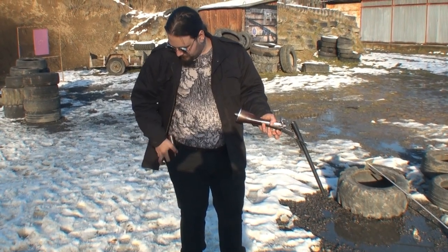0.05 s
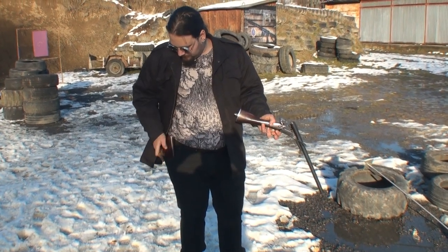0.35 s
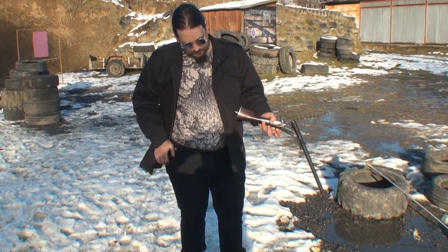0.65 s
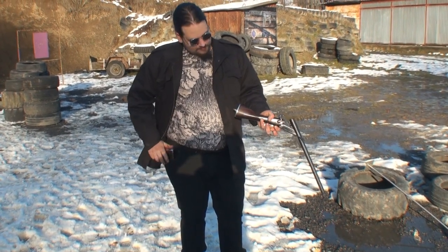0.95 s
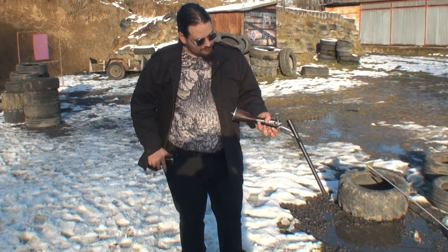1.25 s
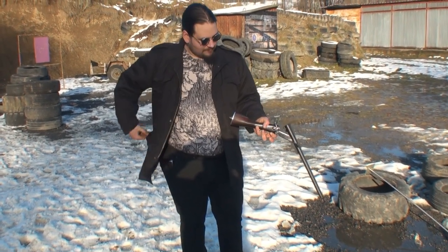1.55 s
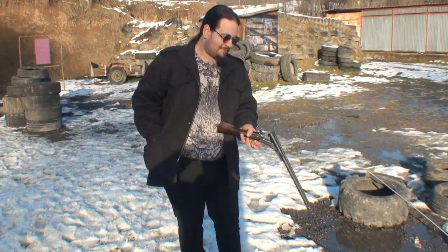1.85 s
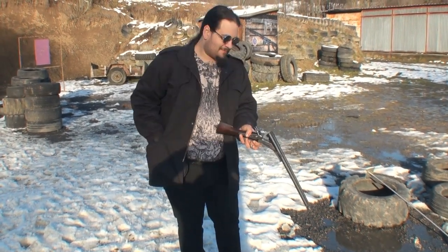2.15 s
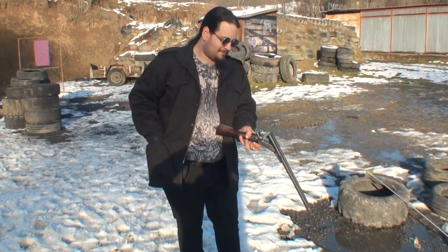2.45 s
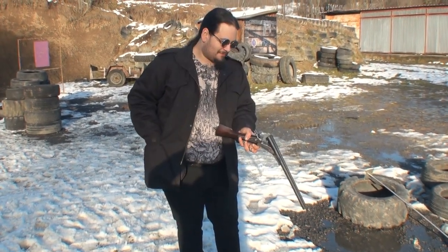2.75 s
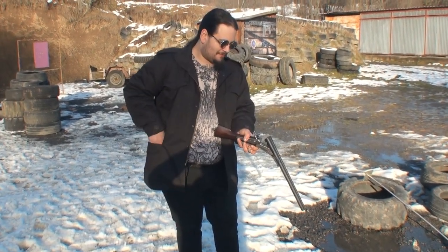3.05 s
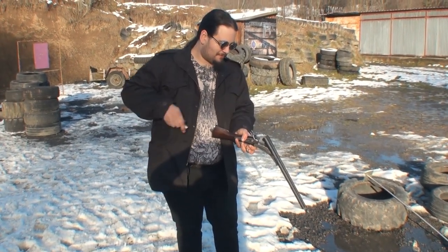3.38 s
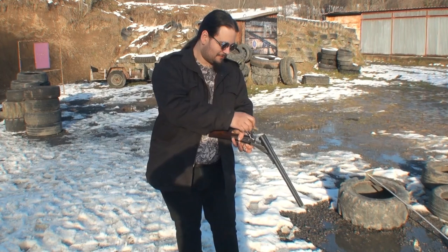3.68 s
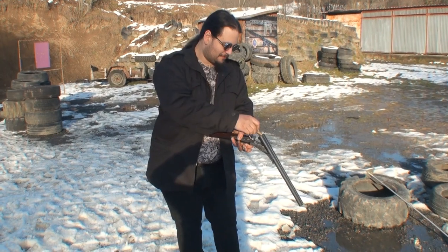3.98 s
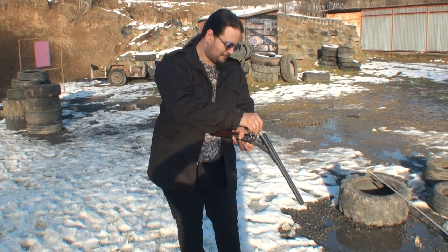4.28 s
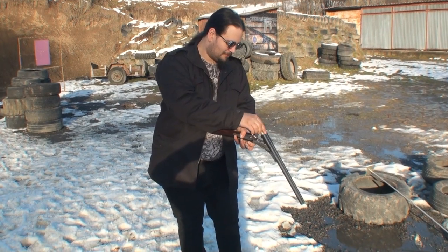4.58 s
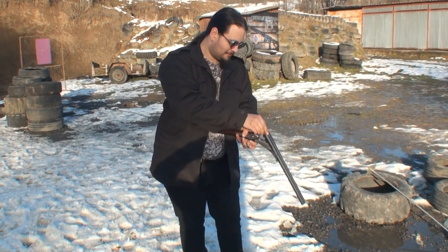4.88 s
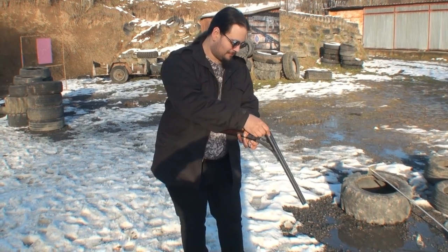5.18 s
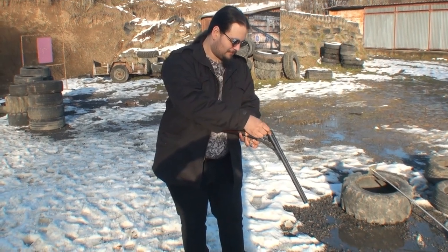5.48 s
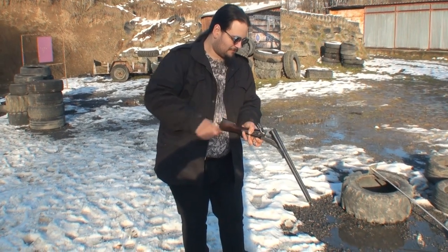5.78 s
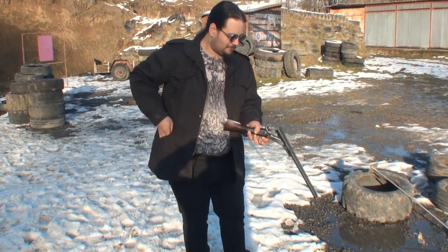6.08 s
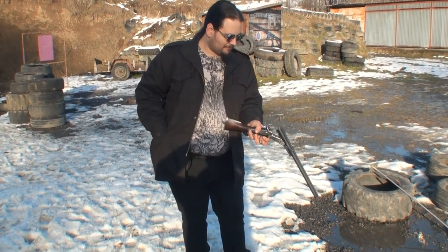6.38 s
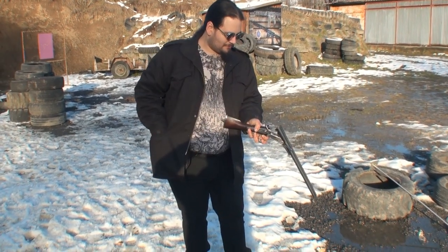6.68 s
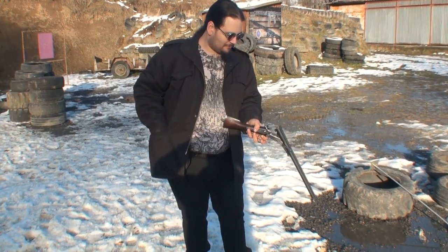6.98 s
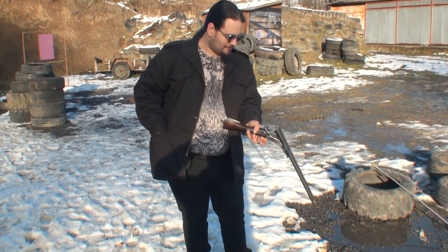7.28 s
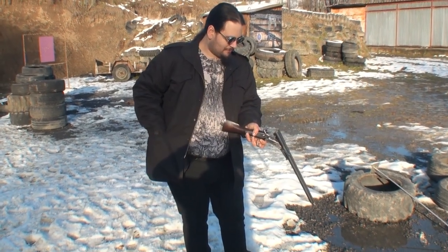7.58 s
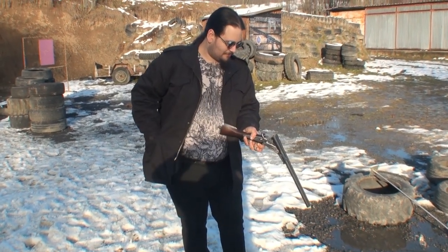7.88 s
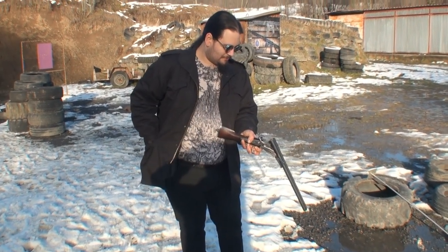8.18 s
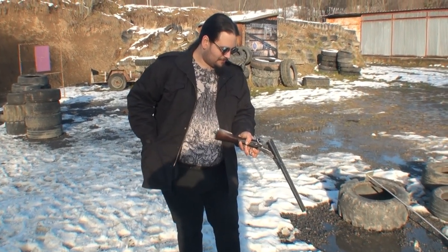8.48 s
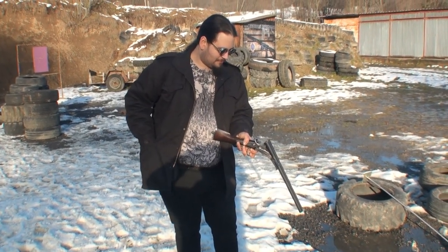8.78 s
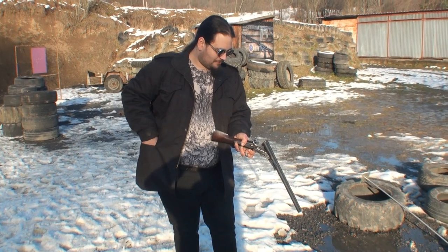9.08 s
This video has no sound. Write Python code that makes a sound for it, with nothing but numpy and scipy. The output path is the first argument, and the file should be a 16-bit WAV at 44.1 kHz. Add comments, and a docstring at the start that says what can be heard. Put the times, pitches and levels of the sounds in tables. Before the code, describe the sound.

A stud snaps shut with one loud, hard click, then a belt catch clacks and gives a tiny squeak. Small metal pieces clink in a jacket pocket. Cartridges tap into a shotgun's steel chambers and seat with a brief ring, followed by a soft plop, more clinks and plastic ticks. Cloth rustles throughout over faint outdoor hiss and a low hollow drone. The handling is straight ahead, with a weak echo.

```python
"""A man loads a broken-open double-barrel shotgun in a snowy yard. A stud snaps, then a belt catch
clacks and squeaks. The level dips briefly; metal pieces clink as he digs in his jacket. From 4 s,
cartridges tap the steel chambers and seat, ringing the barrels. A soft plop follows, then more clinks
and plastic ticks. Throughout, the jacket rustles over faint hiss, hum and a swelling hollow drone;
ground and wall return a weak echo."""
import sys
import numpy as np
from scipy import signal
from scipy.fft import rfft, irfft, next_fast_len
from scipy.io import wavfile
from scipy.ndimage import uniform_filter1d

SR = 44100
rng = np.random.default_rng(int(sys.argv[2]) if len(sys.argv) > 2 else 0)


def transcribe(u):
    """Save the signal u as a 16-bit wav file named by the first command-line argument.

    u: samples, shape (n,) or (channels, n), limited to [-1, 1]; the rate is SR.
    q: integer samples, one column per channel.
    """
    v = np.clip(np.atleast_2d(u).T, -1, 1)
    q = np.round(v * 32767).astype(np.int16)
    wavfile.write(sys.argv[1], SR, q)


N = 412148

# cartridge contacts: start_s, scrape_s, level_db, depth (0 rim, 1 home)
CARTRIDGE_CONTACTS = [(4.003, .005, -45.5, .55), (4.160, 0.0099, -43, .15), (4.250, 0.0096, -37, .5),
                      (4.395, 0.03, -47.5, .05), (5.193, 0.0013, -38.5, 1), (5.2651, .001, -41.5, 1),
                      (5.2712, 0.0035, -41.5, 1)]
# barrel modes: pitch_hz, level_db, t60_s
BARREL_MODES = [(670, -3, 0.078), (1085, 3, 0.094), (1410, -11, 0.059), (1780, -5, 0.021), (2010, 2, 0.068),
                (2460, -7, 0.065), (2800, -13, 0.062), (3180, 3, .02), (3760, 2, 0.023), (4270, -19, 0.013),
                (5680, 9, .03), (7260, 6, .03), (8100, 5, .035), (11800, -1, .03), (12700, -6, .02)]
# barrel bands: edge_hz
BARREL_EDGES_HZ = [500, 1500, 2800, 4500, 6500, 14000]
# rim graze, wall tap, seating: gain_db per band
BARREL_VOICES_DB = [(-1, -10, -16, -19, 1.5), (0, -21, -18, -28, -13.5), (-0.094, -2.5, -5, -6.5, -15)]


def chambers():
    """Cartridges graze the breech and drop home, ringing the barrels."""
    track = np.zeros(N)
    for start_s, scrape_s, level_db, depth in CARTRIDGE_CONTACTS:
        bands_db = level_db + blend_voices(BARREL_VOICES_DB, depth)
        tap = strike(scrape_s, bands_db, BARREL_MODES, BARREL_EDGES_HZ, crack_db=10.5, crack_t60_s=0.014)
        add(track, start_s, tap)
    return amp(-1.1) * track


# stud impacts: start_s, level_db
STUD_IMPACTS = [(0.4337, -27), (0.436, 1.5), (.4376, -24), (.4390, -28), (0.44, -23), (.4424, -35),
                (.4475, -33)]
# stud click spectrum: freq_hz, level_db
STUD_SPECTRUM = [(300, -48), (800, -7.5), (1500, -10), (2300, -0.5), (3000, 3.5), (4000, -1), (5500, -6.5),
                 (8300, -20.5), (11500, -14.5), (13000, -21), (15000, -44)]


def stud():
    """A stud snaps shut: a hard click, small bounces, a trace of buzz."""
    track, click = np.zeros(N), pulse(STUD_SPECTRUM)
    t = np.arange(SR // 20) / SR
    buzz = amp(-29) * rng.standard_normal(len(t)) * fade(t, t60_s=0.044)
    for start_s, level_db in STUD_IMPACTS:
        add(track, start_s, -amp(level_db) * click)
    return amp(-1.5) * (track + signal.fftconvolve(track, buzz)[:N])


# catch contacts: start_s, scrape_s, level_db
CATCH_CONTACTS = [(1.0427, 0.0011, -23.5), (1.0491, 0.0023, -32.5), (1.066, 0.0036, -40),
                  (1.077, .007, -38), (1.122, 0.0092, -36), (1.1293, .003, -34)]
# catch modes: pitch_hz, level_db, t60_s
CATCH_MODES = [(756, 2, 0.052), (1050, 6.5, 0.024), (1840, -9, 0.014), (2060, 8, 0.023),
               (2250, -0.5, 0.024), (3240, 5, 0.024), (3570, 9, 0.01), (4740, 4.5, .018), (5620, 11, 0.014),
               (7330, 7, 0.015), (11300, -13, .012)]
# catch bands: edge_hz
CATCH_EDGES_HZ = [500, 1400, 2700, 4300, 14000]
# catch timbre: gain_db per band
CATCH_VOICE_DB = [-6.5, -.5, -5, -9]
# squeak glide: time_s, pitch_hz, level_db
CATCH_SQUEAK = [(1.1205, 2400, -40), (1.1250, 2120, -23), (1.1280, 2000, -22), (1.131, 1700, -24.5),
                (1.1360, 1650, -45)]


def belt_catch():
    """The stiff catch clacks, then squeaks home; pitch falls as stick-slip slows."""
    track = np.zeros(N)
    for start_s, scrape_s, level_db in CATCH_CONTACTS:
        bands_db = level_db + np.array(CATCH_VOICE_DB)
        clack = strike(scrape_s, bands_db, CATCH_MODES, CATCH_EDGES_HZ, crack_db=4, crack_t60_s=0.015)
        add(track, start_s, clack)
    time_s, pitch_hz, squeak_db = np.transpose(CATCH_SQUEAK)
    t = np.arange(time_s[0], time_s[-1], 1 / SR)
    phase = 2 * np.pi * np.cumsum(np.interp(t, time_s, pitch_hz)) / SR
    squeak = np.sin(phase) + amp(-28) * np.sin(2 * phase)
    add(track, time_s[0], amp(np.interp(t, time_s, squeak_db)) * squeak)
    return amp(-1) * track


# pocket contacts: start_s, scrape_s, knock_db, ring_db, place (0 middle, 1 end), t60_scale
POCKET_CONTACTS = [(1.957, 0.021, -43.5, -44, 0, 1.6), (2.2674, 0.0032, -37.5, -38, 0.24, 0.67),
                   (2.275, .01, -41, -39, 1, 0.63), (2.2875, 0.0074, -34, -31, 1, .45),
                   (2.302, 0.012, -52, -31, 0.63, 0.32), (2.377, .018, -51, -43, .6, .6),
                   (3.012, 0.0026, -38.5, -33, 0.23, 0.51), (3.0528, 0.0025, -46.5, -38, 0, 0.73),
                   (3.108, 0.009, -48, -37, 0.19, 0.46), (6.269, 0.031, -48, -39, 0, 0.92),
                   (6.3175, .0022, -36.5, -51, .7, .7), (6.322, 0.0072, -50, -34, 0.96, 0.74),
                   (6.541, .0034, -46, -42.5, 0.69, 1.7), (6.565, .0036, -52, -39, 0.6, 1.6),
                   (6.584, .0037, -47, -36, 0.18, 1.8), (8.0581, 0.0044, -36.5, -32.5, 0, 0.96),
                   (8.072, .008, -41, -36.5, .4, 0.67), (8.121, .003, -55, -46, 1, 0.74),
                   (8.235, 0.0074, -46, -42.5, 0.58, 1), (8.276, 0.013, -41, -36, .25, .6),
                   (8.7645, 0.0042, -40.5, -35.5, 0.23, 4.3), (8.804, 0.025, -48, -35, 0.53, 0.98),
                   (9.138, 0.019, -59, -46.5, .7, 1)]
# knock spectrum: freq_hz, level_db
KNOCK_SPECTRUM = [(300, -17), (750, 2), (1000, -3), (1280, 5), (1550, -1), (2600, -5.5), (4000, -9.5),
                  (6000, -12.5), (8000, -16), (10000, -19), (13000, -19), (16000, -29)]
# metal piece modes: pitch_hz, level_db, base_t60_s
CLINK_MODES = [(1957, -3, 0.18), (5010, -14.5, 0.15), (5773, -2, 0.15), (5795, -19, 0.22), (5880, -8, 0.12),
               (7000, 0.5, 0.1), (7400, -15, 0.073), (9100, -17, .08), (11300, -19, .09),
               (11080, -2.5, 0.13), (12898, -17, .08), (13561, -14, .08)]
# clink bands: split_hz
CLINK_SPLITS_HZ = [4000, 6500, 9000]
# middle hit, end hit: gain_db per band
CLINK_VOICES_DB = [(0, 0, -19, -12.5), (-13, 0, -2.5, -19.5)]


def pocket_clinks():
    """Small metal pieces knock and ring in pure tones; cloth damping varies per contact."""
    track, t = np.zeros(N), np.arange(SR // 4) / SR
    pitch_hz, mode_db, base_t60_s = np.transpose(CLINK_MODES)
    band = np.digitize(pitch_hz, CLINK_SPLITS_HZ)
    click = pulse(KNOCK_SPECTRUM)
    for start_s, scrape_s, knock_db, ring_db, place, t60_scale in POCKET_CONTACTS:
        force = contact_force(scrape_s, t)
        burst = rng.standard_normal(SR // 20) * fade(t[:SR // 20], t60_s=0.017)
        knock = signal.fftconvolve(click, burst)
        add(track, start_s, amp(knock_db) * unit_hit(signal.fftconvolve(force, knock)))
        modes = np.sin(2 * np.pi * pitch_hz[:, None] * t) * fade(t, base_t60_s[:, None] * t60_scale)
        tones = signal.fftconvolve(force[None], modes, axes=1)
        place_db = blend_voices(CLINK_VOICES_DB, place)[band]
        gains = amp(ring_db + mode_db + place_db + rng.normal(0, 1, len(pitch_hz)))
        add(track, start_s, sum(gain * unit_hit(tone) for gain, tone in zip(gains, tones)))
    return track


# hull and jacket trim contacts: start_s, scrape_s, level_db, hardness (0 to 1)
HULL_CONTACTS = [(0.771, 0.0054, -41, 0.7), (0.988, .012, -40.5, .15), (1.76, 0.0025, -47, .5),
                 (1.8016, .001, -41.5, 0), (3.321, .002, -55, .7), (3.337, 0.036, -42, 1),
                 (3.355, .0069, -47, 0.7), (7.871, .026, -48, .75), (7.913, .012, -42.5, 0.17),
                 (8.102, .012, -43.5, .1), (8.376, 0.013, -40.5, .15), (8.386, .0073, -43, .5),
                 (8.533, 0.013, -47, .5), (8.572, 0.011, -39.5, .5), (8.581, 0.011, -40.5, 0.45)]
# hull modes: pitch_hz, level_db, t60_s
HULL_MODES = [(1200, 1, 0.016), (1390, 8.5, 0.0025), (2970, -8.5, 0.011), (3330, -15, 0.026),
              (5180, -8.5, 0.01), (7430, 1, 0.0045)]
# hull bands: edge_hz
HULL_EDGES_HZ = [500, 1800, 4500, 14000]
# soft, firm, hard contact: gain_db per band
HULL_VOICES_DB = [(-1.5, -9.5, -14), (-8.5, -1, -9.5), (-11, -7, 1.5)]
# hollow plop: start_s, level_db, pitch_hz, length_s
HULL_PLOP = [(6.0620, -28, 660, .0045)]


def hulls():
    """Plastic hulls tick with hardly any ring; one soft plop."""
    track = np.zeros(N)
    for start_s, scrape_s, level_db, hardness in HULL_CONTACTS:
        bands_db = level_db + blend_voices(HULL_VOICES_DB, hardness)
        tick = strike(scrape_s, bands_db, HULL_MODES, HULL_EDGES_HZ, crack_db=-5.5, crack_t60_s=0.0081)
        add(track, start_s, tick)
    for start_s, level_db, pitch_hz, length_s in HULL_PLOP:
        t = np.arange(round(length_s * SR)) / SR
        arch = np.sqrt(np.abs(np.sin(np.pi * t / length_s)))
        add(track, start_s, amp(level_db) * np.sin(2 * np.pi * pitch_hz * t) * arch)
    return track


# jacket motion, used relative to its mean: time_s, motion_db
JACKET_MOTION = [(0.0, -46.5), (0.49, -47.5), (1.33, -46.5), (1.74, -47), (1.93, -48.5), (2.24, -47.5),
                 (2.65, -50.5), (3.38, -50), (4.09, -53), (4.5, -49.5), (5.47, -53), (6.09, -50),
                 (6.22, -48), (6.87, -49.5), (7.39, -50.5), (8.25, -48), (8.74, -49.5), (9.35, -47.5)]
# hand or sleeve brushes: centre_s, length_s, level_db
JACKET_BRUSHES = [(.2, 1, -52.5), (0.68, 0.28, -48), (1.115, 0.19, -44), (3.1, 0.31, -50), (3.597, .3, -54),
                  (6.23, 0.37, -48.5), (6.6, 0.21, -52)]
# cloth rub spectrum: freq_hz, level_db
RUB_SPECTRUM = [(150, -16.5), (400, -6.5), (700, -3), (1300, -7), (2200, -11), (4000, -23), (10000, -37)]
# surface swish spectrum: freq_hz, level_db
SWISH_SPECTRUM = [(500, -25), (1500, -3), (2600, 2.5), (4200, 1), (5500, 0.5), (7400, -1), (9000, -6.5),
                  (11500, -6.5), (16000, -25)]


def jacket():
    """Cloth rubs and swishes, louder with motion; each brush adds swish."""
    motion_db = curve(JACKET_MOTION)
    motion_db -= motion_db.mean()
    t, brushes = np.arange(N) / SR, np.zeros(N)
    for centre_s, length_s, level_db in JACKET_BRUSHES:
        brushes += amp(level_db) * np.cos(np.pi * np.clip((t - centre_s) / length_s, -0.5, 0.5))
    rub = amp(-51 + 1.7 * motion_db) * stereo_noise(RUB_SPECTRUM, patchy_db=3)
    swish = np.hypot(amp(-55 + motion_db), brushes) * stereo_noise(SWISH_SPECTRUM, patchy_db=1.4)
    return rub + swish


# outdoor hiss spectrum: freq_hz, level_db
HISS_SPECTRUM = [(15, -46), (25, -19), (49, -7.5), (96, -10.5), (228, -7), (291, -6), (382, -6.5),
                 (749, -1), (1010, -6), (1680, -5.5), (2260, -9.5), (2520, -5.5), (2730, -11.5),
                 (4450, -12), (15800, -20)]
# drone spectrum: freq_hz, level_db
DRONE_SPECTRUM = [(60, -44), (140, -21), (220, -8), (265, -3), (305, 0), (370, -7.5), (500, -20),
                  (1000, -26), (3000, -75)]
# drone swells: start_s, hold_s, level_db
DRONE_SWELLS = [(0, 0.34, -44), (1.053, 0.71, -51), (2.24, .16, -52), (3.003, 0.42, -55.5),
                (4.35, 0.31, -56.5), (5.184, 0.45, -58.5), (6.3, 0.8, -56), (7.88, 0.44, -53.5),
                (9.053, 0.22, -51)]


def outdoors(rise_db_per_s=53, fall_db_per_s=48):
    """Steady hiss, faint low hum and a hollow drone whose swells rise, hold and fall."""
    t, swells = np.arange(N) / SR, np.zeros(N)
    for start_s, hold_s, level_db in DRONE_SWELLS:
        rise_db = rise_db_per_s * np.maximum(start_s - t, 0)
        fall_db = fall_db_per_s * np.maximum(t - start_s - hold_s, 0)
        swells = np.maximum(swells, amp(level_db - rise_db - fall_db))
    hum_hz_db = [(35, -60), (50, -16), (56, -9), (63, 4), (85, -60), (300, -120)]
    hum = amp(-75.5) * stereo_noise(hum_hz_db, patchy_db=-3)
    hiss = amp(-47.7) * stereo_noise(HISS_SPECTRUM, patchy_db=1.5)
    drone = swells * stereo_noise(DRONE_SPECTRUM, patchy_db=1.5)
    return hiss + drone + hum


# echo decay: freq_hz, t60_s
YARD_DECAY = [(300, 0.055), (2500, 0.26), (10000, 0.079)]


def yard_echo(x, delay_s):
    """Short scattered echo, different at each ear."""
    hz, t, noise = signal.stft(rng.standard_normal((2, SR // 4)), SR, nperseg=256)
    tail = signal.istft(noise * fade(t, along(YARD_DECAY, hz)[:, None]))[1]
    tail = np.pad(tail / np.linalg.norm(tail[0]), ((0, 0), (round(delay_s * SR), 0)))
    return signal.fftconvolve(x[None], tail, axes=1)[:, :N]


# left-right likeness: freq_hz, correlation
STEREO_CORRELATION = [(60, 1), (120, 0.92), (240, 0.94), (480, 0.8), (950, 0.57), (1890, 0.19),
                      (3770, 0.11), (7520, 0.28), (15000, 0.77)]


def stereo_noise(spectrum, patchy_db):
    """Shaped noise at rms 1, with random gain patches in time and frequency."""
    cells = signal.stft(rng.standard_normal((2, N)), nperseg=512)[2]
    patches = uniform_filter1d(rng.standard_normal(cells.shape[1:]), size=10, axis=0)
    patches = uniform_filter1d(patches, size=8, axis=1)
    pair = signal.istft(cells * amp(patchy_db * unit_rms(patches)))[1][:, :N]

    def mid_side_gains(hz):
        angle = np.arccos(np.clip(along(STEREO_CORRELATION, hz), -1, 1)) / 2
        return amp(along(spectrum, hz)) * [np.cos(angle), np.sin(angle)]
    mid, side = filtered(pair, mid_side_gains)
    return unit_rms(np.array([mid + side, mid - side]))


def strike(scrape_s, bands_db, modes, edges_hz, crack_db, crack_t60_s):
    """One contact, levelled per band: dense damped modes crack, a few free ones ring."""
    t = np.arange(SR // 4) / SR
    body = amp(crack_db) * rng.standard_normal(len(t)) * fade(t, crack_t60_s)
    for pitch_hz, level_db, t60_s in modes:
        gain = rng.choice([-1, 1]) * amp(level_db + rng.normal(0, 1))
        body += gain * np.sin(2 * np.pi * pitch_hz * t) * fade(t, t60_s)
    sound = signal.fftconvolve(contact_force(scrape_s, t), body)[:len(t)]
    bands = [signal.butter(4, pair, 'band', fs=SR, output='sos') for pair in zip(edges_hz, edges_hz[1:])]
    return sum(amp(db) * unit_hit(signal.sosfilt(band, sound)) for band, db in zip(bands, bands_db))


def contact_force(scrape_s, t):
    """A first touch, then tiny slips; long scrapes start softly."""
    pressure = (1 - np.exp(-t / (0.34 * scrape_s))) * np.exp(-(t / scrape_s) ** 2)
    grain = rng.standard_normal(len(t))
    slips = unit_hit(grain * np.abs(grain) * pressure)
    touch = 0.53 * unit_hit(t == 0) * np.exp(-scrape_s / 0.02)
    return touch + slips


def blend_voices(voices_db, position):
    """Band gains in dB at position 0 to 1 between evenly spaced voices."""
    grid = np.linspace(0, 1, len(voices_db))
    return np.array([np.interp(position, grid, band_db) for band_db in np.transpose(voices_db)])


def pulse(spectrum, size=1024):
    """Minimum-phase click at peak 1."""
    cepstrum = irfft(np.log(amp(along(spectrum, np.fft.rfftfreq(size, 1 / SR)))))
    cepstrum[1:size // 2] *= 2
    cepstrum[size // 2 + 1:] = 0
    click = irfft(np.exp(rfft(cepstrum)))
    return click / np.abs(click).max()


def amp(db):
    return 10 ** (np.asarray(db) / 20)


def unit_rms(x):
    return x / np.sqrt(np.mean(x ** 2) + 1e-20)


def unit_hit(x):
    """Scale to the energy of 10 ms at rms 1."""
    return x / np.sqrt(np.sum(x ** 2) / (SR / 100) + 1e-20)


def fade(t, t60_s):
    return amp(-60 * t / t60_s)


def along(points, hz):
    """Interpolate (freq_hz, value) points on a log axis."""
    freq_hz, values = np.transpose(points)
    return np.interp(np.log(hz + 1), np.log(freq_hz + 1), values)


def curve(points):
    """Interpolate (time_s, value) points per sample."""
    return np.interp(np.arange(N) / SR, *np.transpose(points))


def add(track, start_s, x):
    part = track[round(start_s * SR):][:len(x)]
    part += x[:len(part)]


def filtered(x, gain_at_hz):
    size = next_fast_len(N + SR // 2)
    return irfft(rfft(x, size) * gain_at_hz(np.fft.rfftfreq(size, 1 / SR)), size)[..., :N]


def scene():
    """Handling sounds from straight ahead, scattered by ground and wall, over rustle and outdoor air."""
    snap = stud()
    handling = belt_catch() + pocket_clinks() + chambers() + hulls()
    direct = (handling + snap) * amp([[0.25], [-0.25]])
    ground = amp(-14) * yard_echo(handling, delay_s=0.002)
    wall = amp(-21) * yard_echo(handling + snap, delay_s=0.022)
    return direct + ground + wall + jacket() + outdoors()


# brief level dip: time_s, gain_db
LEVEL_DIP = [(1.903, 0), (1.931, -33), (1.955, 0)]


def record(dry, cutoff_hz=15850):
    """One brief level dip, then a brick-wall low-pass."""
    return filtered(dry * amp(curve(LEVEL_DIP)), lambda hz: hz < cutoff_hz)


dry = scene()
out = record(dry)
transcribe(out)
```